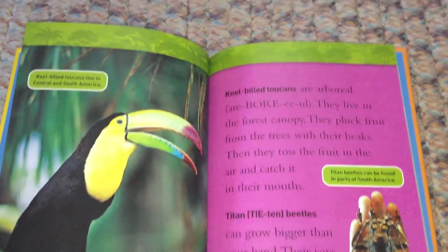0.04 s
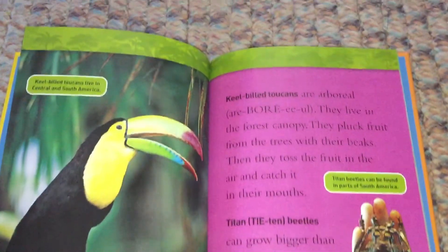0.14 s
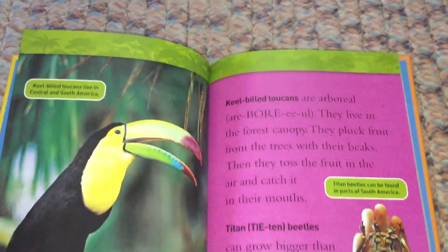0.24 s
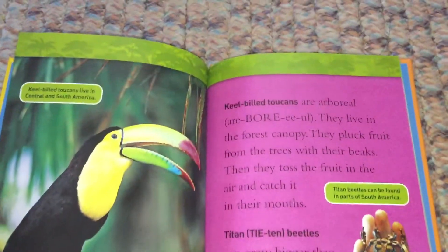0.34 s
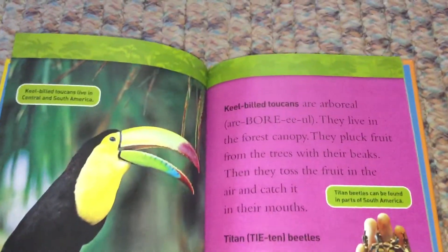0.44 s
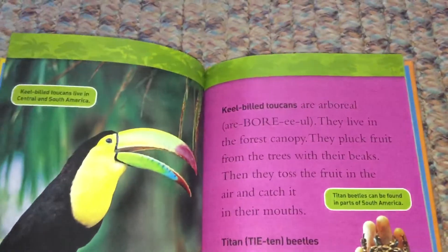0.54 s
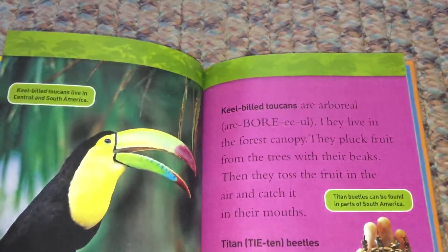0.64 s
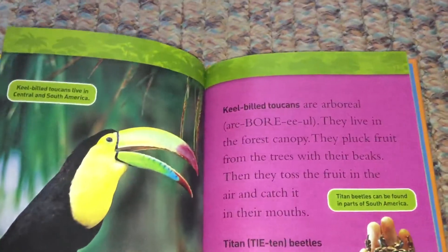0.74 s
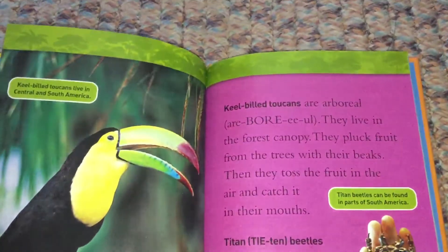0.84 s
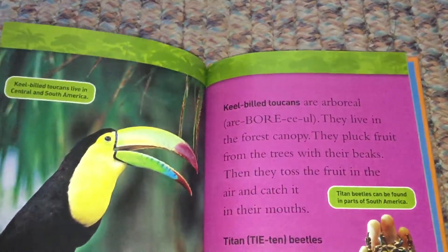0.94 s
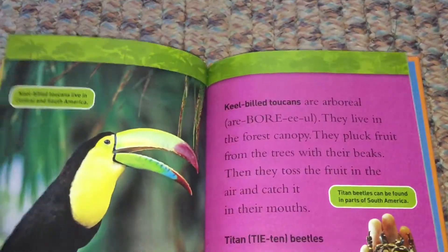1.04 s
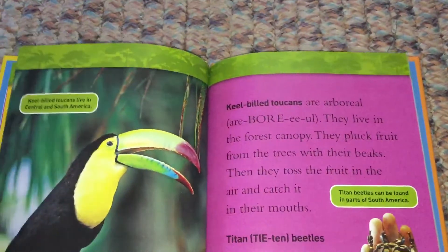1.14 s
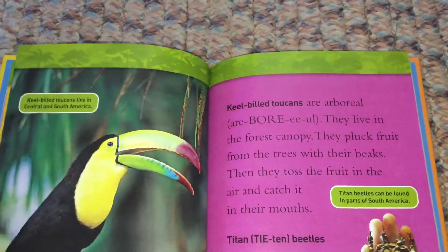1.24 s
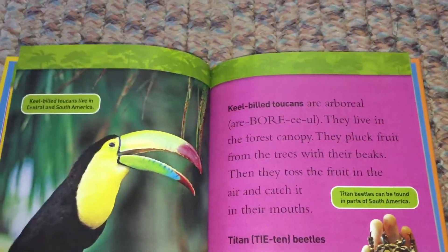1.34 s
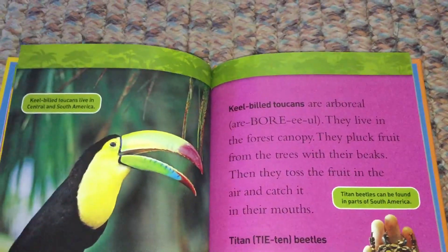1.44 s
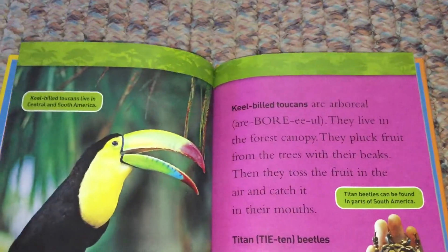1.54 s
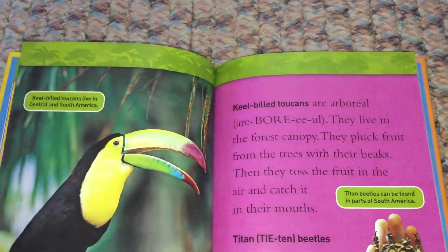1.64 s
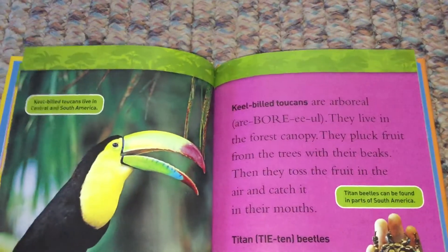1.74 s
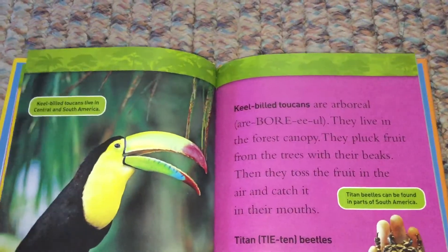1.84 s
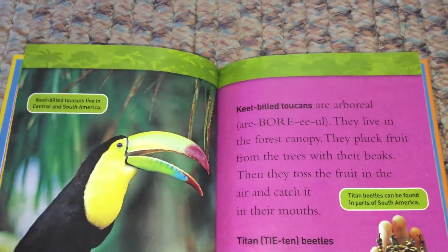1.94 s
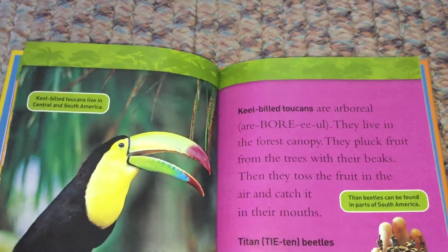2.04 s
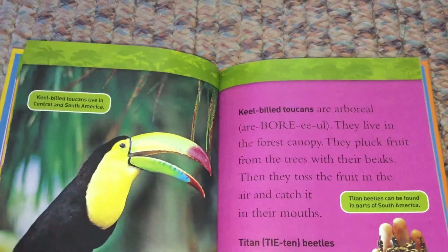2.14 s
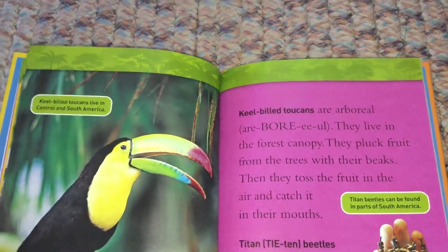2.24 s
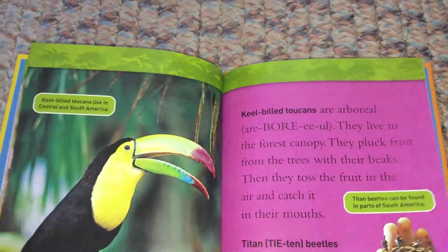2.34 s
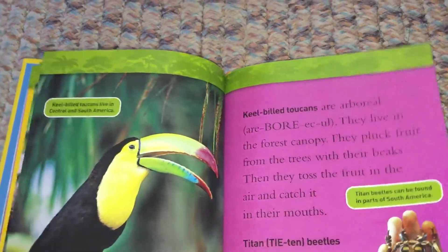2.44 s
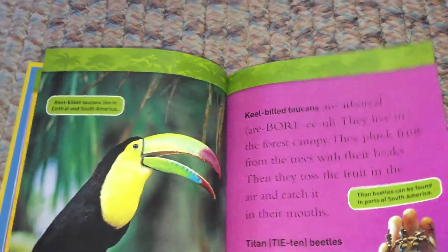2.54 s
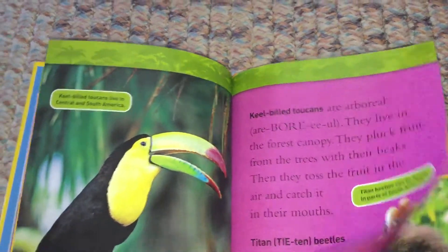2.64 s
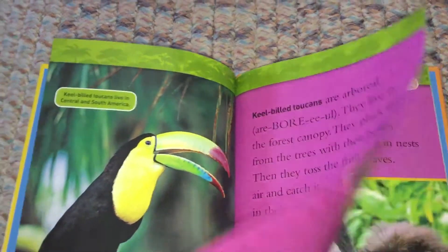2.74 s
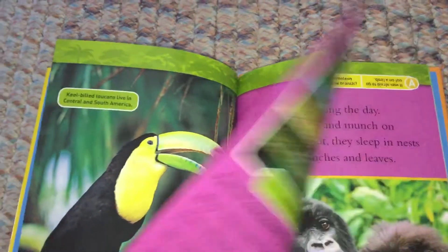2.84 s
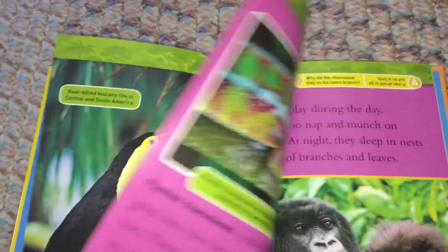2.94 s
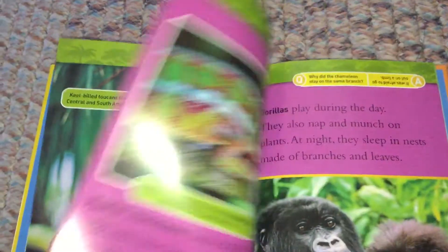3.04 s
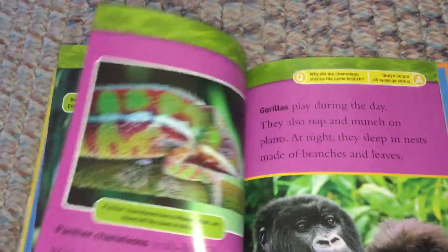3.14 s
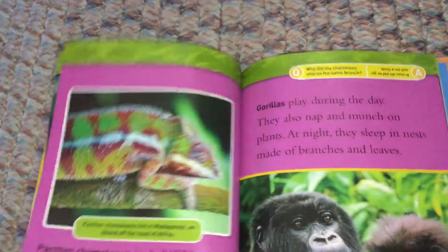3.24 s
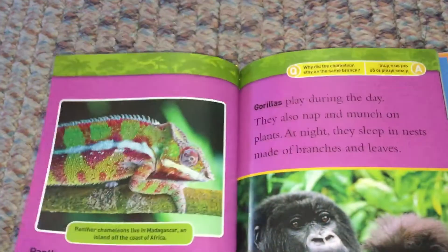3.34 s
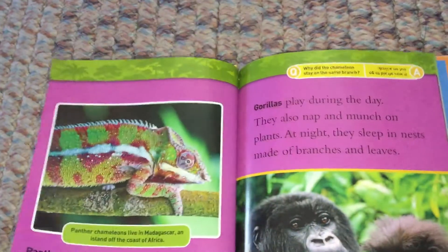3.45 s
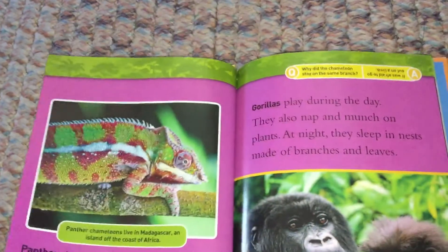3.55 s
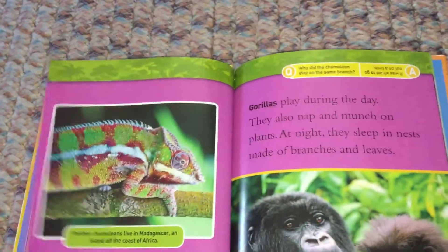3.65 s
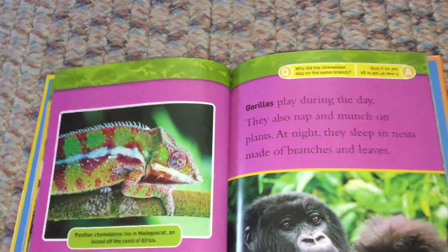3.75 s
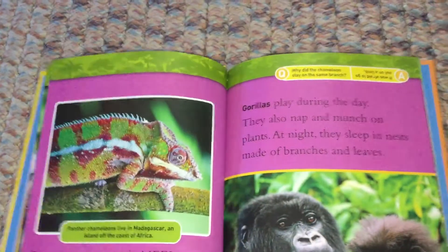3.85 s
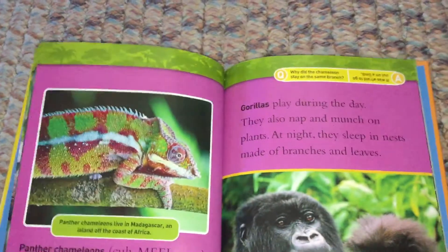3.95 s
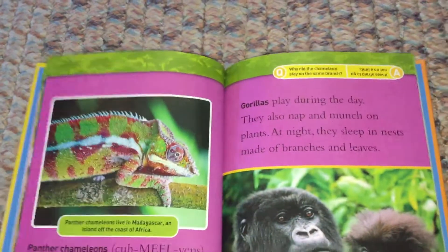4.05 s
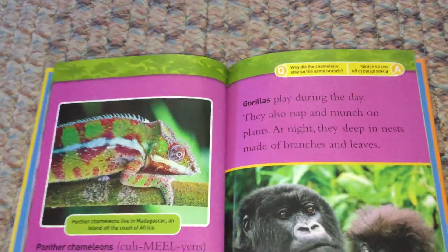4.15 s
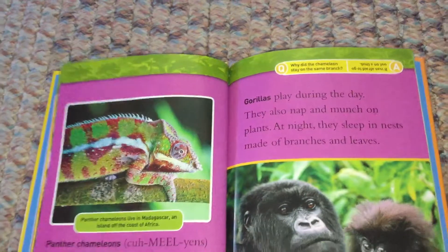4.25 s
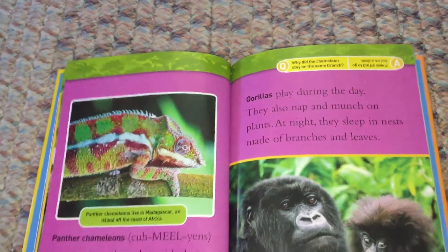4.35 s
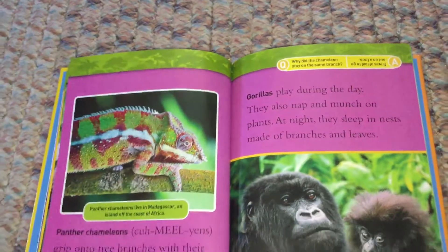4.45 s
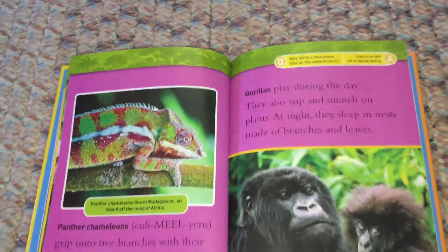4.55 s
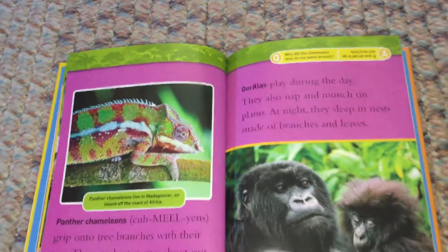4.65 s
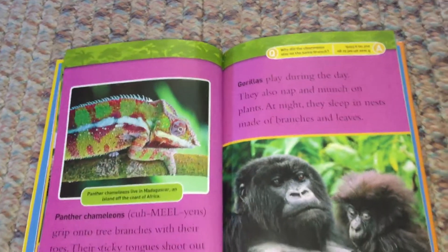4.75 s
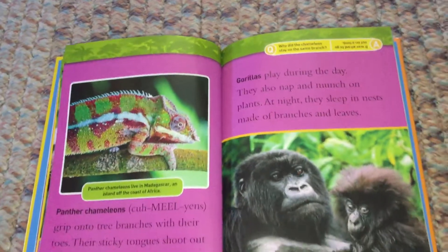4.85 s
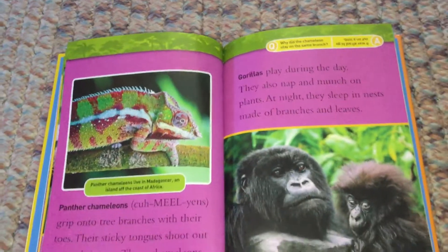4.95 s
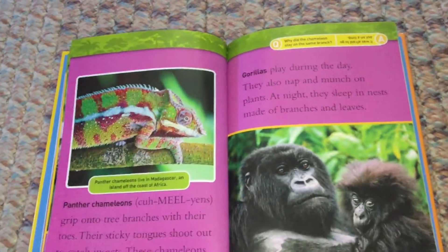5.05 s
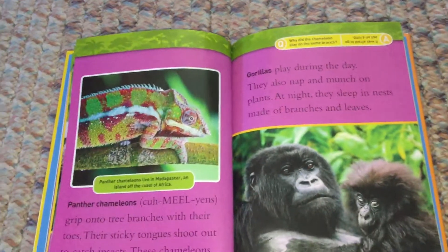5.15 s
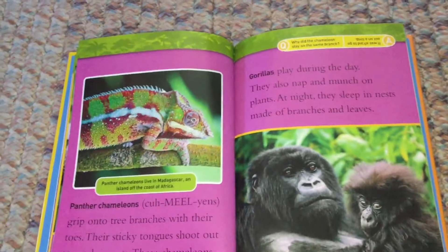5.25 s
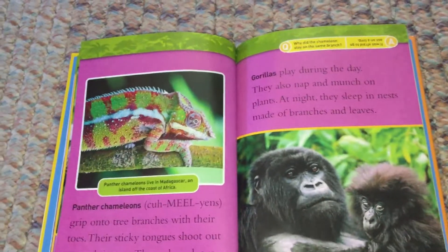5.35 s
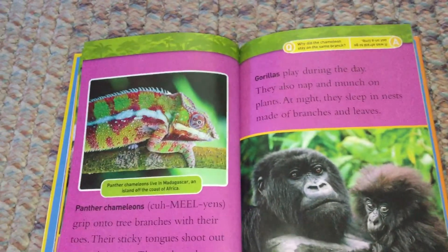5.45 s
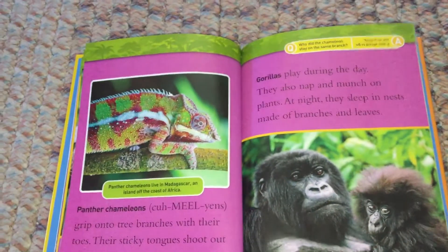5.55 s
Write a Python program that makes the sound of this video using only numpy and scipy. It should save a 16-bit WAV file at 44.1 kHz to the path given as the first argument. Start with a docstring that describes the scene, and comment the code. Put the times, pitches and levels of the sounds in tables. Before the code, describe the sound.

A quiet indoor room with a faint, steady low hum and soft air, miked close with hardly any echo. For the first two seconds fingers barely brush a glossy page: tiny dry rubs around 0.8 to 1.3 s, a faint crinkle near 1.6 s, a weak stroke near 2 s. From 2.25 s the sheet is peeled up with a growing scrape and short skid, strongest near 2.5 s, then crisp snaps at 2.55 to 2.63 s. A hissy swish follows at 2.7 to 2.98 s as it swings over. Between 3.0 and 3.7 s it buckles in a crackling run of sharp snaps with soft low puffs, the strongest near 3.7 s. Light smoothing rubs continue to 4.4 s, with a clear fingertip tap at 4.16 s. Small dull taps come near 4.5 s, then near silence and thin bright ticks around 5.2 s, leaving the hum.

```python
"""Turning a glossy page

A picture book lies open on a carpet in a quiet room with a low mains hum; the paper is close, its echo faint.
Fingers brush the page, lift it and swing it over: grains of friction give the rub, hiss and skids. The sheet
buckles in sharp snaps (noise jolts ringing resonances), and low swells puff and thump from under it. Fingertips
tap the pages where they lie flat, and a few small ticks follow. A suppressor in the recorder turns down faint
bands, and the extreme treble is cut."""
import sys
import numpy as np
from scipy import signal
from scipy.fft import rfft, irfft, next_fast_len
from scipy.io import wavfile
from scipy.ndimage import uniform_filter1d

SR = 44100
rng = np.random.default_rng(int(sys.argv[2]) if len(sys.argv) > 2 else 0)


def transcribe(signal):
    """Save signal, clipped to [-1, 1], as a 16-bit WAV file at the path in sys.argv[1]."""
    frames = np.atleast_2d(signal).T
    limited = np.clip(frames, -1, 1)
    pcm = np.round(limited * 32767).astype(np.int16)
    wavfile.write(sys.argv[1], SR, pcm)


N = 246322
TIME = np.arange(N) / SR
STEPS = np.arange(0, N / SR, .001)   # coarse clock for the contacts [s]
CUTOFF_HZ = 16200   # top of the recorded band


def from_db(db):
    """Decibels to gain."""
    return 10 ** (np.asarray(db) / 20)


def rms_one(x):
    """Scales to rms 1."""
    return x / np.sqrt(np.mean(x ** 2) + 1e-20)


def at_level(burst, db):
    """Scales a burst so that its energy, spread over 10 ms, has this rms level."""
    return from_db(db) * burst / np.sqrt(np.sum(burst ** 2) / (SR / 100) + 1e-20)


def add(out, s, burst):
    """Mixes a burst in at time s."""
    start = round(s * SR)
    out[start:start + len(burst)] += burst[:N - start]


def at_hz(points, hz):
    """Reads a spectrum on a log-frequency axis."""
    point_hz, point_db = np.array(points).T
    return np.interp(np.log(hz), np.log(point_hz), point_db)


def in_time(rows, times):
    """Joins rows by straight lines; one curve per column."""
    s, *columns = np.transpose(rows)
    return [np.interp(times, s, c) for c in columns]


def hump(hz, centre_hz, octaves):
    """Outline of a resonance: 1 at its centre."""
    return 1 / (1 + (np.log2(hz / centre_hz) / octaves) ** 2)


def drift(rate):
    """Slow chance: noise at a 40th of the sample rate, smoothed twice at this rate in Hz; spread 1."""
    r = np.exp(-80 * np.pi * rate / SR)
    noise = rng.standard_normal(N // 40 + 2002)
    slow = signal.lfilter([1], [1, -2 * r, r * r], noise)[2000:]
    return np.interp(np.arange(N) / 40, np.arange(len(slow)), rms_one(slow))


def coloured(x, spectrum):
    """Gives noise a spectrum; rms 1."""
    size = next_fast_len(len(x))
    hz = np.maximum(np.fft.rfftfreq(size, 1 / SR), 1)
    return rms_one(irfft(rfft(x, size) * from_db(at_hz(spectrum, hz)), size)[:len(x)])


def resonate(x, hz, width_hz):
    """One resonance with gain 1 on top."""
    r = np.exp(-np.pi * width_hz / SR)
    feedback = [1, -2 * r * np.cos(2 * np.pi * hz / SR), r * r]
    return signal.lfilter(np.array([1, 0, -1]) * (1 - r * r) / 2, feedback, x + 1e-18)


def jolt(ms, kick, size=2048):
    """A sudden give, then a dying cascade of tiny slips; evenly coloured, so the body sets the tone."""
    t = np.arange(size) / SR
    slips = rng.standard_normal(size) * np.exp(-t / (ms / 1000))
    spectrum = rfft(slips / np.linalg.norm(slips) + kick * (t == 0), 2 * size)
    even = irfft(spectrum / (np.abs(spectrum) + 1e-9) ** .8, 2 * size)[:size]
    return even * np.exp(-t / (4 * ms / 1000))


def ring(force, modes, tilt_db, vary_db, detune):
    """Modes in parallel; pitch and strength change a little with every call."""
    chance = rng.standard_normal((len(modes), 2))
    out = 0
    for k, ((hz, width, db), (louder, sharper)) in enumerate(zip(modes, chance)):
        tilted_db = db + tilt_db * np.log2(hz / modes[0][0]) + vary_db * louder
        out = out + (-1) ** k * from_db(tilted_db) * resonate(force, hz * np.exp(detune * sharper), width)
    return out


# the sheet buckles: (time [s], ring level [dB], crack level [dB], ring brightness [dB/octave],
# length [ms], pitch of the bend [Hz], pitch muted by the fingers [Hz], top of the crack [Hz])
SNAPS = [ (1.572, -52, -51.5, 1, 7.7, 1410, 2000, 15000), (2.5523, -37.5, -47, -1, 1.6, 1800, 1080, 8000),
         (2.6256, -33.5, -34.5, 4.5, 3.6, 2580, 1550, 7500), (2.6297, -36, -52, 0, 3.2, 2400, 1500, 9000),
         (3.015, -43.5, -53, 1, 6, 2360, 3000, 14000), (3.0732, -42.5, -65, -3, 1.7, 1680, 600, 9000),
         (3.1174, -45, -47, 2, 2.2, 2500, 1800, 15000), (3.139, -41.5, -49, 9, 2.4, 2200, 3000, 14000),
         (3.3073, -41.5, -47, -4.5, 3.2, 2300, 600, 8500), (3.3093, -32, -40, 4, 1.9, 2740, 1780, 12510),
         (3.326, -50.5, -60, 8.5, 1, 2500, 1100, 7000), (3.3577, -35.5, -42, -2.5, 1.7, 1200, 1900, 15500),
         (3.4647, -32, -43.5, 2, 1.5, 1100, 3100, 14500), (3.4872, -48, -57, 5, 1, 2500, 1100, 10000),
         (3.5139, -35.5, -51, -4, 1.6, 1080, 3300, 16000), (3.5622, -34, -41, 2, 1.7, 1950, 1500, 13970),
         (3.6194, -56, -75, -4, 1.5, 1700, 2500, 9000), (3.6455, -51, -70, 0, 2.4, 1700, 2500, 9000),
         (3.6855, -40, -37, -1.5, 5.9, 1800, 1100, 15000),
         (3.689, -28.5, -48.5, -2.5, 3.8, 1800, 2400, 11000),
         (3.6962, -37, -60, 0.5, 2.8, 1350, 1900, 9000), (3.7011, -44.5, -60, -3, 5, 1500, 2000, 9000),
         (3.9306, -47.5, -47, -2, 1.8, 1150, 1700, 14000),
         (3.9379, -44.5, -54.5, 7, 2.2, 2200, 1500, 13000),
         (4.026, -64.5, -54.5, 5, 0.8, 2500, 1100, 15000), (4.2681, -44, -62, 0.5, 0.96, 1160, 2200, 11000)]
# resonances of the bent sheet: (pitch [Hz], width [Hz], level [dB])
SHEET = [(715, 400, -7), (1090, 390, 3), (1400, 470, 1), (1800, 240, 4), (2400, 250, 0), (2820, 260, -2.5),
         (3900, 150, -6.5)]
# resonances of the crack: (pitch [Hz], width [Hz], level [dB])
CRACK = [(4300, 1000, 5), (6100, 1500, 5), (7280, 1500, 6), (11400, 2300, 2), (15000, 1500, 1.5)]
CRACK_SHARE, CRACK_KICK = 0.7, 0.6   # share of the buckle's length, and suddenness
BEND_DB, MUTE_DB = 3.5, 4   # lift near the pitch of the bend, loss near the pitch the fingers mute
# the pages below thump: level under a ring of MEDIUM_SNAP_DB, and dB per dB of ring
THUMP_DB, THUMP_FOLLOWS, MEDIUM_SNAP_DB = -56.5, 0.67, -40


def snaps():
    """Each buckle rings the sheet, cracks in the treble and thumps the pages below."""
    out = np.zeros(N)
    damping = signal.butter(6, 4700, "low", fs=SR, output="sos")   # paper damps its high modes
    no_bass = signal.butter(2, 650, "high", fs=SR, output="sos")   # a thin sheet radiates little bass
    no_rumble = signal.butter(3, 150, "high", fs=SR, output="sos")
    for s, ring_db, crack_db, brightness_db, ms, bend_hz, muted_hz, top_hz in SNAPS:
        force = jolt(ms, kick=1.4 / np.sqrt(ms))   # the shorter the buckle, the more sudden
        modes = []
        for hz, width, db in SHEET:
            bend = BEND_DB * hump(hz, bend_hz, octaves=0.3)
            mute = MUTE_DB * hump(hz, muted_hz, octaves=0.075)
            modes.append((hz, width, db + bend - mute))
        sheet = ring(force, modes, np.clip(brightness_db, -9, 5), vary_db=1, detune=.02)
        sheet = signal.sosfilt(no_bass, signal.sosfilt(damping, sheet))
        crack_force = jolt(ms * CRACK_SHARE, kick=CRACK_KICK / np.sqrt(ms))
        crack = ring(crack_force, CRACK, 0, vary_db=1.5, detune=.04)
        crack = signal.sosfilt(signal.butter(3, min(top_hz, CUTOFF_HZ), fs=SR, output="sos"), crack)
        thump = signal.sosfilt(no_rumble, resonate(resonate(force, 180, 420), 220, 670))
        thump_db = THUMP_DB + THUMP_FOLLOWS * (ring_db - MEDIUM_SNAP_DB)
        add(out, s, at_level(sheet, ring_db) + at_level(crack, crack_db) + at_level(thump, thump_db))
    return out


# every contact grips and lets go
GRIP_DB_PER_S, LET_GO_DB_PER_S = 1898.5, 749


def grip(start, end):
    """Envelope of a contact in dB: quick attack, hold, release."""
    return -GRIP_DB_PER_S * np.maximum(start - STEPS, 0) - LET_GO_DB_PER_S * np.maximum(STEPS - end, 0)


# a stroke is fastest in its middle; loss at either end, largest for the edge hiss
RUB_ARCH_DB, HISS_ARCH_DB = 0.5, 4.5


def finger_stroke(start, length, rub_db, swell_db, hiss_db, flutter_db, *colour):
    """One short slide: pressure grows or fades evenly while the speed arches."""
    progress = np.clip((STEPS - start) / length, 0, 1)
    pressure_db = grip(start, start + length) + swell_db * (progress - .5)
    slowness = (2 * progress - 1) ** 2
    rub = rub_db + pressure_db - RUB_ARCH_DB * slowness
    hiss = hiss_db + pressure_db - HISS_ARCH_DB * slowness
    return rub, hiss, flutter_db + pressure_db, *colour


# as more of the sheet comes free it sounds duller: brightness [dB/octave], and its fall per second
FREE_BRIGHTNESS_DB, DULLING_DB_PER_S = 6, 15


def page_sweep(levels, rub_db, hiss_db, flutter_db, curl_hz, sink_octaves_per_s, height_db, edge_hz):
    """A long slide of the whole sheet: it dulls and the resonance of its curl sinks as it comes free."""
    start, end = levels[0][0], levels[-1][0]
    age = np.clip(STEPS, start, end) - start
    rub, hiss, flutter = np.array(in_time(levels, STEPS)) + grip(start, end)
    brightness_db = FREE_BRIGHTNESS_DB - DULLING_DB_PER_S * age
    face_hz = curl_hz * 2 ** (-sink_octaves_per_s * age)
    return rub + rub_db, hiss + hiss_db, flutter + flutter_db, brightness_db, face_hz, height_db, edge_hz


# the sheet shivers on after each snap: level against the snap, its fall, and its parts against the rub
SHIVER_DB, SHIVER_DB_PER_S, SHIVER_HISS_DB, SHIVER_FLUTTER_DB = -20.5, 298.5, -13.5, -6


def shiver(s, ring_db, brightness_db, face_hz, height_db, edge_hz):
    """The dying rustle that a snap leaves in the sheet."""
    falling_db = ring_db + SHIVER_DB - SHIVER_DB_PER_S * (STEPS - s)
    db = np.where(STEPS > s, falling_db, -np.inf)
    return db, db + SHIVER_HISS_DB, db + SHIVER_FLUTTER_DB, brightness_db, face_hz, height_db, edge_hz


# fingers and paper slide: (start [s], length [s], rub level [dB], swell from start to end [dB],
# edge hiss level [dB], flutter level [dB], brightness [dB/octave], face resonance [Hz],
# its height [dB], edge resonance [Hz])
STROKES = [ (0.378, 0.15, -76, 13, -99, -103, -0.5, 2400, -4.5, 9000),
           (0.486, 0.18, -79, 4, -91, -79, 1.5, 1160, 2, 9000),
           (0.818, 0.098, -68, 19.5, -75.5, -77, 0.5, 2400, 3, 10300),
           (0.924, 0.039, -62, -3.5, -62.5, -70, 6.5, 4700, 0.5, 9300),
           (0.971, 0.053, -58.5, -4, -64.5, -64.5, 2, 1230, 11.5, 9200),
           (1.194, 0.054, -54.5, 3, -62.5, -65.5, -2, 2450, 0, 6300),
           (1.34, 0.13, -69, 4.5, -89, -82, -4, 1080, 3.5, 11600),
           (1.572, 0.031, -56, -11.5, -62.5, -67, 6, 1430, 12, 13500),
           (1.682, 0.051, -57.5, 10, -69.5, -64.5, -0.5, 1180, 8, 11800),
           (1.966, 0.091, -63, -14.5, -72.5, -73, 1.5, 1240, 6, 11400),
           (2.585, 0.091, -50.5, -4.5, -45, -59.5, 7, 3600, 0.5, 7470),
           (2.997, 0.15, -57, -5.5, -69, -67.5, -0.5, 2240, -5.5, 9100),
           (3.109, 0.087, -52, -3, -63, -60.5, 1, 1552, 13, 13000),
           (3.187, 0.17, -64, -21.5, -91, -75, -4.5, 1540, -4, 11910),
           (3.433, 0.095, -54.5, -0.5, -62.5, -65, -3.5, 2000, 0.5, 11030),
           (3.627, 0.021, -55, 8, -80.5, -66, -9, 1500, 4.5, 12000),
           (3.659, 0.019, -39.5, 12, -43, -70, -1, 1664, 12.5, 12500),
           (3.688, 0.057, -67, -23.5, -76, -50, -8, 1673, 7.5, 11070),
           (3.792, 0.15, -56, 9.5, -57.5, -66.5, -1, 1740, 9.5, 9000),
           (3.933, 0.12, -58, -8.5, -62.5, -64, -1, 2215, -6.5, 10270),
           (4.076, 0.1, -65.5, 10.5, -73.5, -76.5, -1, 1970, -9.5, 9700),
           (4.166, 0.05, -60.5, -28.5, -72, -61.5, -6.5, 1510, -10.5, 9700),
           (4.257, 0.095, -59.5, -1.5, -65.5, -63, -1, 1870, 0, 13700),
           (4.339, 0.059, -66, 2, -81, -70, -8.5, 1850, 0, 12900)]
# the page is peeled off the stack, then swung over; each sweep shifts these levels as a whole:
# (time [s], rub level [dB], edge hiss level [dB], flutter level [dB])
PEEL = [(2.24, -77.5, -91, -106), (2.264, -62.5, -64, -88), (2.342, -56.5, -55, -69.5),
        (2.404, -40, -54, -79), (2.456, -43.5, -55, -58), (2.472, -39, -57.5, -78), (2.496, -32, -55, -52),
        (2.524, -44.5, -55.5, -84.5), (2.54, -58, -66, -71.5)]
SWING = [(2.7, -66, -59, -54), (2.73, -62, -63, -89), (2.748, -53.5, -49.5, -67), (2.8, -47.5, -51, -63),
         (2.812, -48.5, -51, -78), (2.914, -50.5, -71, -77), (2.955, -45, -60, -70),
         (2.985, -72.5, -73, -78)]


def handling():
    """All contacts together: their powers add up, and the loudest dominate the colour."""
    contacts = [finger_stroke(*row) for row in STROKES]
    contacts.append(page_sweep(PEEL, rub_db=-5.5, hiss_db=4.5, flutter_db=6.5, curl_hz=3780,
                               sink_octaves_per_s=2.0, height_db=5.5, edge_hz=7140))
    contacts.append(page_sweep(SWING, rub_db=-1.5, hiss_db=-0.5, flutter_db=1.0, curl_hz=2750,
                               sink_octaves_per_s=0.94, height_db=-3, edge_hz=7000))
    for s, ring_db, *_ in SNAPS:
        contacts.append(shiver(s, ring_db, brightness_db=0.5, face_hz=1800, height_db=2, edge_hz=12000))
    curves = np.stack([np.broadcast_arrays(*c) for c in contacts], axis=1)
    rub, hiss, flutter, brightness_db, face_hz, height_db, edge_hz = curves
    rub, hiss, flutter = (from_db(np.maximum(db, -160)) ** 2 for db in (rub, hiss, flutter))
    gains = [np.sqrt(power.sum(axis=0)) for power in (rub, hiss, flutter)]
    colours = [np.average(c, axis=0, weights=rub) for c in (brightness_db, face_hz, height_db)]
    edge = np.average(edge_hz, axis=0, weights=hiss)
    return [np.interp(TIME, STEPS, c) for c in (*gains, *colours, edge)]


def friction(per_s, spread_db, smooth):
    """Fibres catch and let go: dense clicks of uneven size over a smooth rush."""
    sizes = from_db(spread_db * np.minimum(rng.exponential(1, N), 4)) * rng.choice([-1, 1], N)
    clicks = sizes * (rng.random(N) < per_s / SR)
    return rms_one(clicks) + smooth * rng.standard_normal(N)


FIBRES_PER_S, FIBRE_SPREAD_DB, RUSH_SMOOTHNESS = 9000, 4, 1.0   # the grain of sliding paper


def rush(spectrum, lowest_hz, count, colour_db):
    """Friction in quarter-octave bands, which follow colour_db(hz) and swell by chance as the sheet bends."""
    edges = lowest_hz * 2 ** (np.arange(count + 1) / 4)
    drives = [rms_one(friction(FIBRES_PER_S, FIBRE_SPREAD_DB, RUSH_SMOOTHNESS)) for _ in range(2)]
    out, power = 0, 0
    for k, (low, high) in enumerate(zip(edges, edges[1:])):
        hz = np.sqrt(low * high)
        band_pass = signal.butter(2, [low, high], "band", fs=SR, output="sos")
        band = signal.sosfilt(band_pass, drives[k % 2])   # neighbours have separate grains
        gain = from_db(at_hz(spectrum, hz))
        out = out + band * gain * from_db(colour_db(hz) + 2.3 * drift(4))
        power += gain ** 2 * (high - low) / (SR / 2)
    return out / np.sqrt(power)


# reflections off the pages, the hand and the floor: (delay [ms], level [dB])
BOUNCES = [(.89, -8), (2.1, -11), (3.7, -9)]


def bounce(x):
    """The reflections comb the sound, and wander as the hand moves."""
    out = x
    for ms, db in BOUNCES:
        late_s = (ms + .03 * drift(1)) / 1000
        out = out + from_db(db) * np.interp(TIME - late_s, TIME, x)
    return out / np.sqrt(1 + sum(from_db(db) ** 2 for ms, db in BOUNCES))


# colours of the face rub, the edge hiss and the flutter: (frequency [Hz], relative density [dB])
RUB = [(300, -30.5), (550, -26.5), (800, -2), (1100, 4), (1400, 0.5), (1800, 6), (2500, 3.5), (3400, 1.5),
       (4600, -1), (6300, -8.5), (9000, -21), (15000, -41)]
HISS = [(3000, -15), (5500, 4), (7500, 0), (9600, 8), (11500, -1), (14000, 6), (16000, -4)]
FLUTTER = [(50, -40), (100, -26.5), (150, -7), (300, 6), (450, 0), (650, 7), (1000, -28), (2000, -42)]


def sliding():
    """Rub of the page face, hiss of its edge and low flutter, all under one unsteady pressure."""
    rub, hiss, flap, brightness_db, face_hz, height_db, edge_hz = handling()

    def face_colour(hz):
        """Brightness tilt and the face resonance, in dB."""
        tilt = brightness_db * np.clip(np.log2(hz / 1900), -.5, 1.7)
        return tilt + height_db * (hump(hz, face_hz, octaves=.27) - .35)

    def edge_colour(hz):
        """The edge resonance, in dB."""
        return 11 * hump(hz, edge_hz, octaves=.22) - 7.5

    face = rub * rush(RUB, 271.8, count=22, colour_db=face_colour)
    edge = hiss * rush(HISS, 3400, count=9, colour_db=edge_colour)
    flutter = flap * coloured(rng.standard_normal(N), FLUTTER)
    pressure = from_db(1.2 * drift(70))
    return pressure * (bounce(face + edge) + flutter)


# skin skids on the gloss and draws out one narrow resonance:
# (start [s], length [s], level [dB], pitch [Hz], width [Hz], glide [octaves/s])
SKIDS = [(0.849, 0.17, -70, 1010, 260, 0.5), (0.88, 0.138, -66, 4430, 1090, 0.59),
         (0.989, 0.04, -62, 701, 242, -0.23), (1.207, 0.054, -64, 378.4, 195, 2.4),
         (2.393, 0.069, -46.5, 2656, 520, -1.9), (2.854, 0.11, -60, 1353, 600, 0.11),
         (3.805, 0.053, -64.5, 8200, 1090, 1), (3.911, 0.082, -60.5, 9400, 1090, 0.31),
         (4.294, 0.064, -66, 3090, 378, -1.4), (4.345, 0.04, -68.5, 4200, 432, -2.1)]


def skids():
    """Friction rings one resonance of the sheet, which glides as the finger travels."""
    out = np.zeros(N)
    in_phase = friction(per_s=1000, spread_db=5.0, smooth=0.4)
    drive = in_phase + 1j * friction(per_s=680, spread_db=-0.5, smooth=0.2)
    for start, length, db, hz, width_hz, glide in SKIDS:
        near = (TIME > start - .02) & (TIME < start + length + .08)
        t = TIME[near]
        # low-passed friction, moved up to the gliding pitch, makes a band of this width
        swell = signal.sosfilt(signal.butter(3, width_hz / 2, fs=SR, output="sos"), drive[near])
        phase = 2 * np.pi * np.cumsum(hz * 2 ** (glide * (t - start))) / SR
        level_db = db + np.interp(t, STEPS, grip(start, start + length))
        out[near] += from_db(level_db) * rms_one((swell * np.exp(1j * phase)).real)
    return out


# fingertips tap the pages where they lie flat: (time [s], level [dB], brightness [dB/octave],
# length [ms], pitch ratio, edge ring level [dB], edge ring pitch [Hz])
TAPS = [(0.4989, -59.5, -2.5, 7.5, 0.92, -79, 4460), (2.124, -60, -1.5, 21, 0.94, -67, 3100),
        (4.1644, -31.5, 3.5, 2.5, 1.037, -53, 4310), (4.2511, -54.5, -11, 5, 1.08, -75, 4080),
        (4.4662, -50.5, -3, 6.2, 0.95, -57.5, 4100), (4.5555, -52.5, -1.5, 5.2, 0.83, -71.5, 4300),
        (4.5738, -48, 0.5, 4.2, 0.943, -69.5, 4300)]
# resonances of the flat pages: (pitch [Hz], width [Hz], level [dB])
STACK = [(328, 95, 6), (540, 104, 3.5), (1080, 126, 7), (1700, 204, 7.5), (2540, 270, 1.5)]
TAP_DAMPING_HZ, EDGE_RING_WIDTH_HZ = 3230, 880


def taps():
    """A soft fingertip knocks on the stack of pages; the edge of the top sheet rings above it."""
    out = np.zeros(N)
    softness = signal.butter(5, [170, TAP_DAMPING_HZ], "band", fs=SR, output="sos")
    for s, db, brightness_db, ms, ratio, edge_db, edge_hz in TAPS:
        force = jolt(ms, kick=0.32)
        modes = [(hz * ratio, width, level) for hz, width, level in STACK]
        knock = signal.sosfilt(softness, ring(force, modes, brightness_db, vary_db=1.0, detune=0.01))
        edge = resonate(resonate(force, edge_hz, EDGE_RING_WIDTH_HZ), edge_hz, EDGE_RING_WIDTH_HZ)
        add(out, s, at_level(knock, db) + at_level(edge, edge_db))
    return out


# low swells from under the falling page: air squeezed out, and the pages below thumping after some snaps: (time
# [s], level [dB], pitch [Hz])
PUFFS = [(3.019, -51.5, 208), (3.128, -52, 159), (3.311, -48.5, 275), (3.36, -52, 295), (3.516, -50, 215),
         (3.5634, -48, 235), (3.691, -46, 174), (3.938, -48, 198)]
PUFF_CYCLES = 0.73   # cycles from the start of a puff to its height


def puffs(size=8192):
    """Each makes a soft low swell of a few cycles."""
    out, t = np.zeros(N), TIME[:size]
    no_rumble = signal.butter(2, 120, "high", fs=SR, output="sos")
    for s, db, hz in PUFFS:
        swell = t * np.exp(-t * hz / PUFF_CYCLES)
        puff = signal.sosfilt(no_rumble, swell * np.sin(2 * np.pi * hz * t))
        add(out, s, at_level(puff, db))
    return out


# small ticks: (time [s], level [dB], length [ms], knock level [dB], pitch ratio)
TICKS = [(4.9505, -71, 5, -100, 2), (5.168, -77, 5, -100, 4), (5.2178, -48, 3, -72, 1.05),
         (5.2305, -40.5, 1, -63, 1), (5.236, -54, 12, -70, 1), (5.2575, -52, 3.5, -52, 0.95)]
# what the ticks ring with: (pitch [Hz], width [Hz], level [dB])
TICK_MODES = [(1575, 370, 0), (2082, 410, 2), (2860, 490, 1), (4300, 700, -5.5), (5153, 135, -7.5)]
# band of a tick at pitch ratio 1: (low edge [Hz], high edge [Hz])
TICK_BAND_HZ = (1300, 5800)


def ticks():
    """Thin bright ticks, the later ones with a soft hollow knock."""
    out = np.zeros(N)
    for s, db, ms, knock_db, ratio in TICKS:
        force = jolt(ms, kick=0.43)
        band_hz = np.minimum(np.array(TICK_BAND_HZ) * ratio, CUTOFF_HZ)
        narrow = signal.butter(4, band_hz, "band", fs=SR, output="sos")
        modes = [(min(hz * ratio, CUTOFF_HZ), width, level) for hz, width, level in TICK_MODES]
        thin = signal.sosfilt(narrow, ring(force, modes, 0, vary_db=3.0, detune=0.0089))
        knock = resonate(resonate(force, 397.0, 38), 550, 760)
        add(out, s, at_level(thin, db) + at_level(knock, knock_db))
    return out


# decay time in the bass, gain of the echoes, and the walls' treble loss
ROOM_T60_S, ROOM_DB, WALL_CUT_HZ = 0.32, -16.5, 17000


def room(x, count=10):
    """Dull echoes circling between the walls, smeared by allpasses."""
    size = next_fast_len(N + SR // 2)
    hz = np.fft.rfftfreq(size, 1 / SR)
    wall = 1 / (1 + 1j * hz / WALL_CUT_HZ)
    response = 0
    lags = np.geomspace(.008, .037, count) * rng.uniform(.94, 1.06, count)   # seconds
    for k, lag in enumerate(lags):
        echo = from_db(-60 * lag / ROOM_T60_S) * np.exp(-2j * np.pi * hz * lag)
        response = response + (-1) ** k * echo / (1 - echo * wall)
    for lag in (.0011, .0027):
        delay = np.exp(-2j * np.pi * hz * lag)
        response = response * (delay - .5) / (1 - .5 * delay)
    return irfft(rfft(x, size) * response * wall, size)[:N] / np.sqrt(count)


# air of the room: (frequency [Hz], relative density [dB])
AIR = [(25, -54), (70, -50), (105, -36), (150, -17), (205, 4), (280, -4), (360, -19), (550, -26),
       (1100, -26), (2200, -35), (6000, -35), (12000, -38), (15000, -46)]
AIR_DB = -72
# the hum, the drone and the low air dip briefly: (time [s], width [s], level [dB])
DIPS = [(1.305, 0.026, -9), (1.5, 0.021, -27), (4.675, 0.022, -23)]
HUM_HZ, HUM_DB = 238.6, -68.5   # mains hum (dB rms, about which it drifts)
DRONE_HZ, DRONE_WIDTH_HZ, DRONE_DB = 202, 2.5, -79   # the appliance's casing drones


def background():
    """An appliance hums and drones over a low rush of air; all but the higher air dips briefly."""
    hum_phase = 2 * np.pi * HUM_HZ * TIME + 0.14 * drift(1.4)
    hum = from_db(HUM_DB + 1.9 * drift(8.0)) * np.sqrt(2) * np.sin(hum_phase)
    casing = resonate(rng.standard_normal(N), DRONE_HZ, DRONE_WIDTH_HZ)
    drone = from_db(DRONE_DB) * rms_one(resonate(casing, DRONE_HZ, DRONE_WIDTH_HZ))
    air = from_db(AIR_DB) * coloured(rng.standard_normal(N), AIR)
    low_air = signal.sosfiltfilt(signal.butter(2, 600, fs=SR, output="sos"), air)
    dip_db = sum(db * np.exp(-((TIME - s) / width) ** 2) for s, width, db in DIPS)
    return from_db(dip_db) * (hum + drone + low_air) + air - low_air


def scene():
    """The near sounds, their room and the background."""
    near = sliding() + skids() + snaps() + taps() + puffs() + ticks()
    return (near + from_db(ROOM_DB) * room(near) + background())[None]


# the recorder's noise suppressor turns down whatever lies under this level: (frequency [Hz], density [dB per Hz])
QUIET = [(120, -140), (250, -116), (420, -106), (1000, -105), (4000, -108), (8000, -114), (15000, -120)]
SUPPRESS_DB = -6.5   # the most it turns down


def suppress(x, size=512):
    """Faint bands are turned down frame by frame: tails end early and resonances stand out."""
    framing = dict(nperseg=size, noverlap=size * 3 // 4, scaling="psd")
    hz, _, frames = signal.stft(x, SR, **framing)
    power = uniform_filter1d(2 * np.abs(frames) ** 2, size=3, axis=-2)   # smoothed over frequency
    power = uniform_filter1d(power, size=3, axis=-1)   # and over time
    quiet = from_db(at_hz(QUIET, np.maximum(hz, 1)))[:, None] ** 2
    gain = np.maximum(power / (power + quiet), from_db(SUPPRESS_DB))
    return signal.istft(frames * gain, SR, **framing)[1][..., :N]


def record(dry):
    """Faint noise is suppressed, and the top is cut steeply."""
    steep_cut = signal.ellip(10, .1, 70, CUTOFF_HZ, fs=SR, output="sos")
    return signal.sosfilt(steep_cut, suppress(dry))


dry = scene()
out = record(dry)
transcribe(out)
```